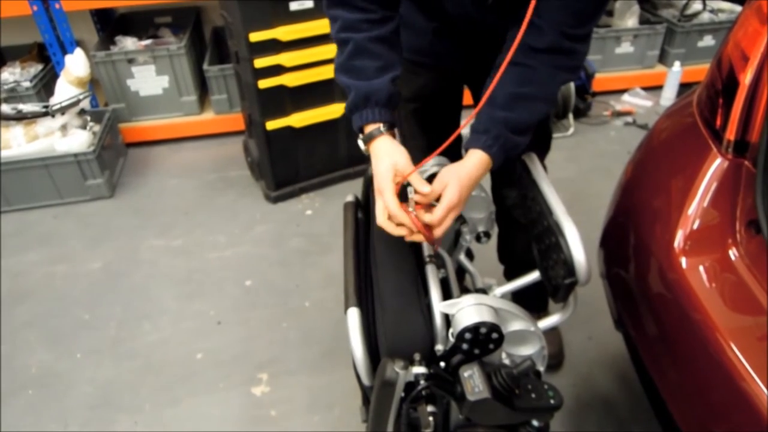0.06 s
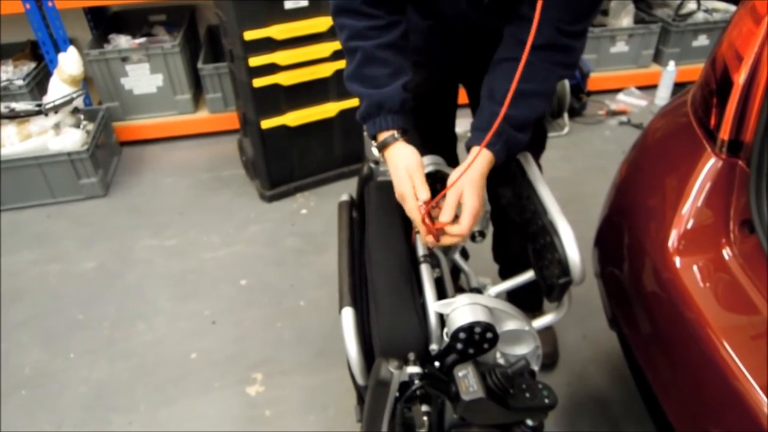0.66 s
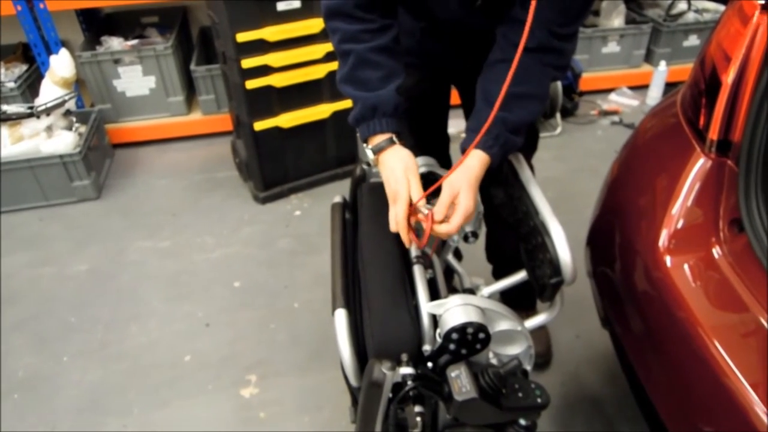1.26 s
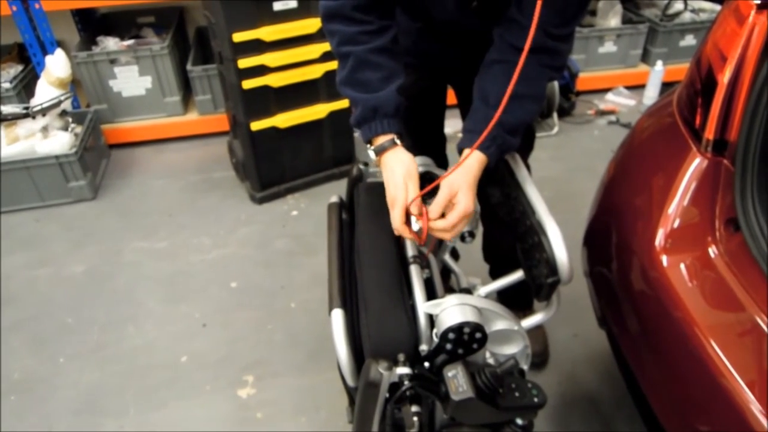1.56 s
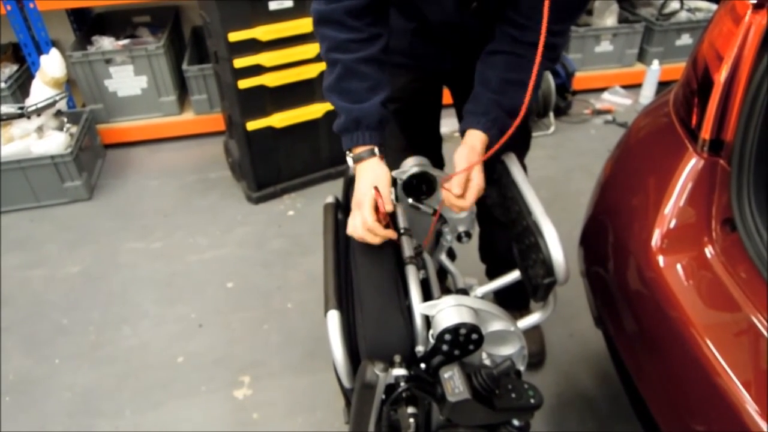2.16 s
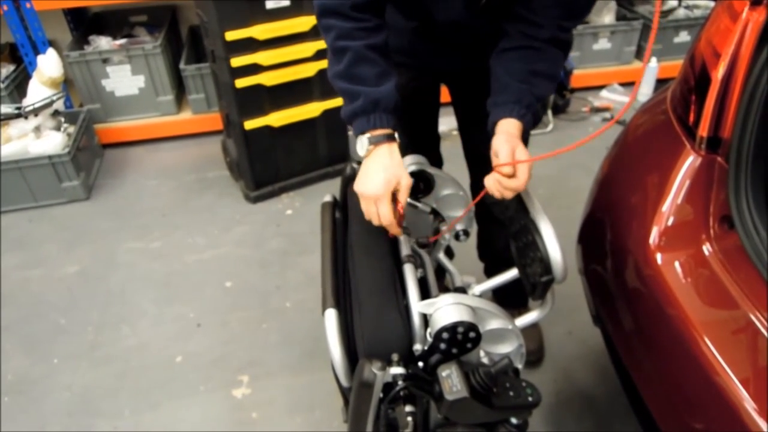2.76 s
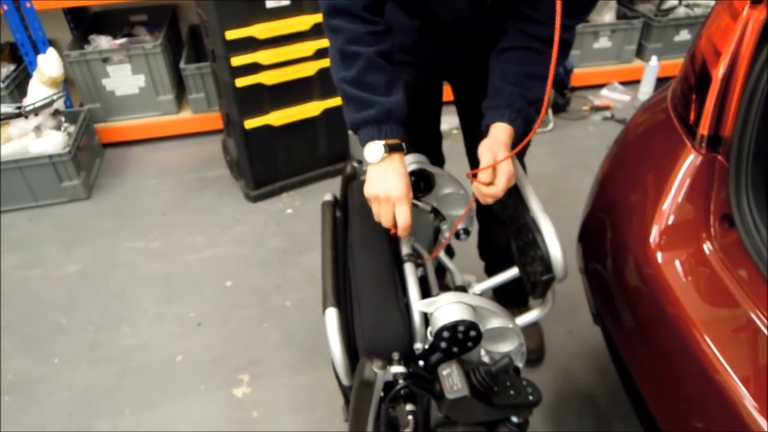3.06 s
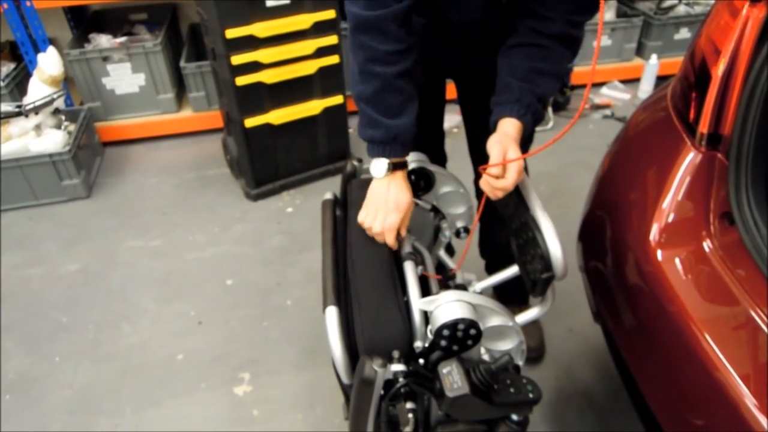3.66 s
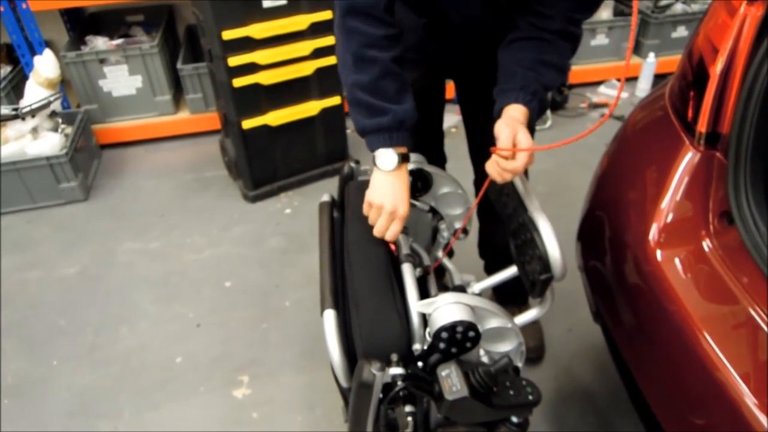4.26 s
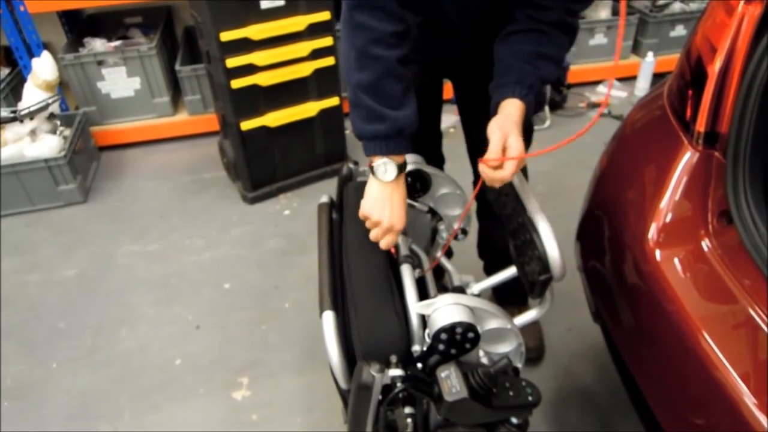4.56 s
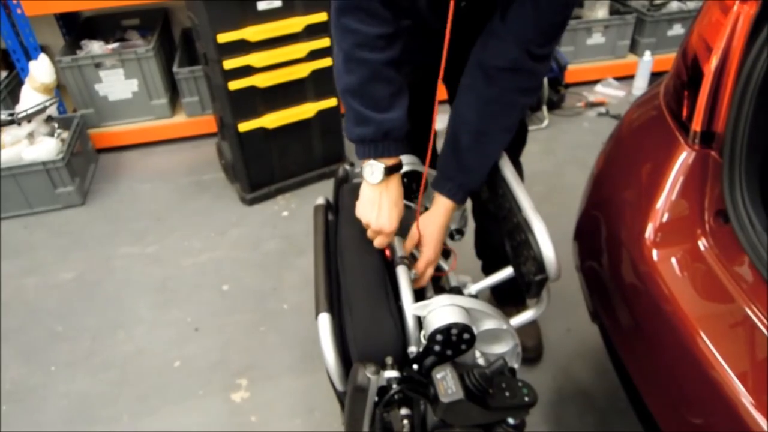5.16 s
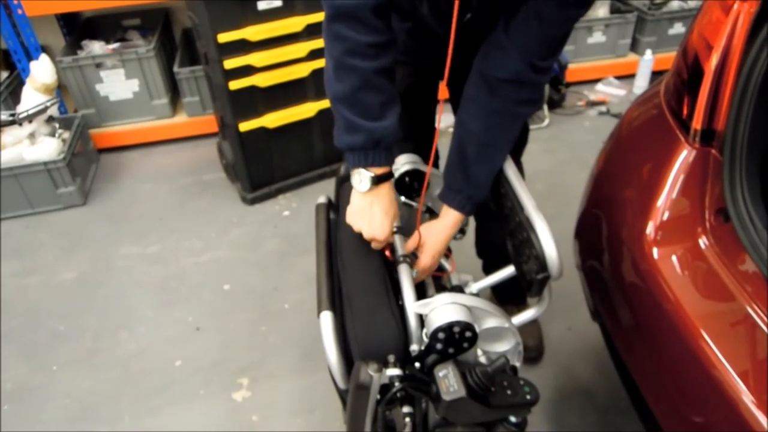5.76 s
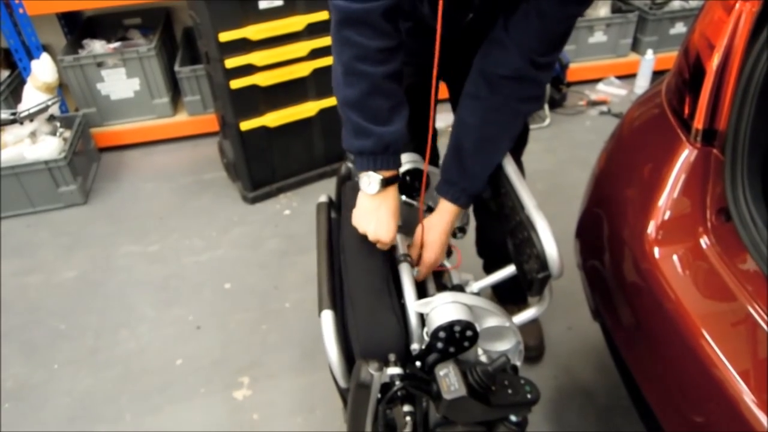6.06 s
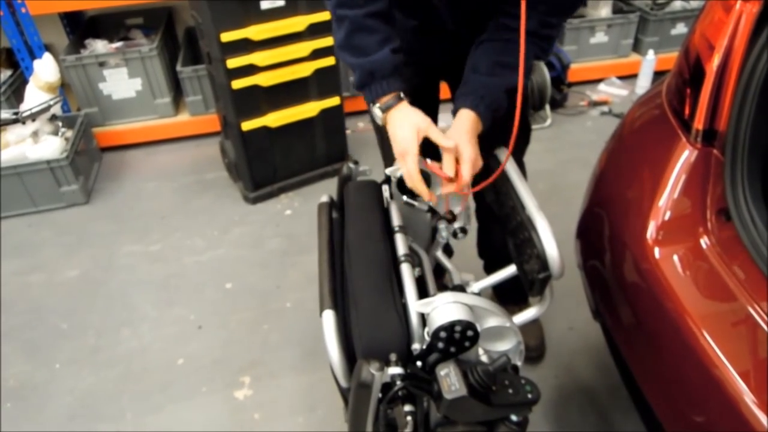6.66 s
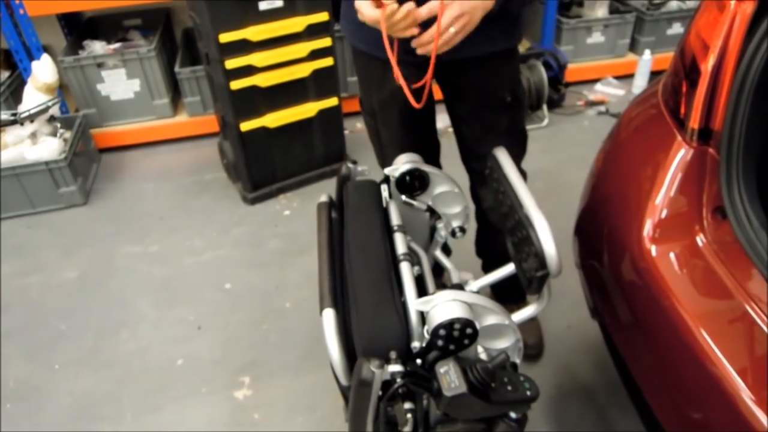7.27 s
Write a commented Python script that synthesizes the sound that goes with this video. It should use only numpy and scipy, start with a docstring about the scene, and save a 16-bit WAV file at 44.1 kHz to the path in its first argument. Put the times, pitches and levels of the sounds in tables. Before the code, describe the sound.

Close to the microphone, hands fasten a strap to a metal wheelchair frame. Clinks and two sharp snaps of a spring clip come first, followed by a few light knocks on tubing. The strap slides in short, soft hisses with tiny clicks, and one loud metallic clack ends the handling. The workshop adds a short echo and a low, steady murmur of ventilation.

```python
"""Spring clips snap shut and knock on the metal tubes of a folded wheelchair as hands fasten a strap.
Each impact excites the damped modes of gate, hook or frame; the nearest snaps overload the microphone.
Strap and sleeves slide with a friction hiss, and the chair rocks once on its tyres with a soft thud.
Ventilation murmurs behind them, and the hard walls of the workshop reverberate."""
import sys
import numpy as np
from scipy import signal
from scipy.fft import rfft, irfft, next_fast_len
from scipy.io import wavfile
from scipy.ndimage import uniform_filter1d

SR = 44100
rng = np.random.default_rng(int(sys.argv[2]) if len(sys.argv) > 2 else 0)


def dump_mix(stems):
    """Bounce the given channels to the path in sys.argv[1] as a 16-bit WAV at rate SR."""
    frames = np.atleast_2d(stems).T  # one column per channel
    limited = np.clip(frames, -1, 1)  # hard clip at full scale
    pcm = np.round(limited * 32767).astype(np.int16)
    wavfile.write(sys.argv[1], SR, pcm)


N = 331177
TIME = np.arange(N) / SR
RING_TIME = TIME[:SR]   # one second

# spectrum of the ventilation air: (frequency [Hz], gain [dB])
AIR_SPECTRUM = [(12, -42), (20, 1.5), (60, 0), (85, -5), (125, -5), (170, -7), (206, -2.5), (263, -10),
                (302, -6.5), (337, -11), (980, -13.5), (1090, -14.5), (1190, -16), (2000, -19),
                (14000, -28)]
# fan tones: (frequency [Hz], level [dB])
FAN_TONES = [(209.9, -63.5), (301.5, -74.5), (635.2, -76), (1163, -72.5)]
# stereo width of the air and of scattered sound: (frequency [Hz], side over mid [dB])
AIR_SIDE = [(60, -10), (180, -8.5), (540, -5), (1640, -3.5), (4950, -1), (14900, 1.5)]
SCATTER_SIDE = [(200, -20), (1300, -22), (2400, -18.5), (4400, -8), (8000, -6), (14000, 1.5)]
# decay of the room and of the frame's dense modes: (frequency [Hz], t60 [s])
ROOM_DECAY = [(200, .6), (1500, 1), (4000, 0.77), (8000, 0.57), (14000, 0.37)]
FRAME_DECAY = [(250, 0.14), (1500, 0.18), (4000, 0.092), (8000, 0.08), (14000, 0.11)]
# pulls of the strap through the hand: (peak time [s], half-width [s], level [dB])
STRAP_STROKES = [(3.356, 0.041, -44.5), (3.597, 0.06, -40.5), (4.082, 0.028, -47.5), (4.368, 0.099, -48),
                 (4.55, 0.024, -50.5), (5.518, 0.051, -40), (5.9, 0.065, -53.5)]
# spectra of cloth friction, metal contact, a whole knock and a snap: (frequency [Hz], gain [dB])
FRICTION_SPECTRUM = [(150, -22), (400, 0.5), (800, 0.5), (1500, -3), (3500, 0), (6000, -3.5), (9000, -1),
                     (14000, -6.5)]
CONTACT_SPECTRUM = [(300, -24), (1500, -2.5), (3500, 1.5), (9000, 2)]
KNOCK_SPECTRUM = [(60, -49), (170, -11.5), (270, -6), (550, -4), (900, -4.5), (1700, -2), (3000, 0.5),
                  (5200, -2.5), (6800, -3.5), (8200, -3), (10500, -13.5), (14000, -11.5)]
SNAP_SPECTRUM = [(100, -34), (1300, -34.5), (2400, -12), (3700, -13.5), (5000, -9), (6300, -6.5),
                 (7700, -7.5), (8900, 1.5), (9900, -4.5), (10700, -7), (14000, -13.5)]
# modes of the frame tubes, the steel hook and its gate: (frequency [Hz], relative level [dB], t60 [s])
TUBE_RESONANCES = [(272.2, -27, 0.39), (321, -24, 0.088), (436, -25.5, 0.41), (660, -34.5, 0.19),
                   (1161, -32, 0.36), (1351, -24.5, 0.068), (1438, -17, 0.08), (1560, -30.5, 0.18),
                   (1700, -16, 0.15), (1810, -17.5, 0.15), (1937, -19.5, 0.18), (2420, -27, 0.18),
                   (2830, -23, 0.17), (3430, -22, 0.081), (3570, -26, 0.073), (4296, -26.5, 0.1),
                   (4690, -26.5, 0.16)]
HOOK_RESONANCES = [(5960, -20.5, 0.13), (6000, -27.5, 0.72), (6060, -18.5, 0.088), (6230, -19, 0.095)]
GATE_RESONANCES = [(2940, -13, .2), (6158, -21, .35), (8820, -7.5, 0.027), (9180, -8.5, .14),
                   (9420, -11, 0.24), (9870, -12, .05)]
# knocks of a clip on the frame: (time [s], strength [dB], bass [dB], low mids [dB],
# hardness as treble tilt [dB/octave], favoured frequency [Hz], its boost [dB], hook ring [dB])
CLIP_KNOCKS = [(0.1013, 18, -4.5, 0.5, -5, 1090, 6.5, -8), (0.104, 14.5, 1.5, -2, -4, 1143, 14.5, -11),
               (0.257, 3.5, -3, 2, -16, 1160, 4.5, -20), (0.6712, 1.5, -0.5, 3.5, -8.5, 3080, 5, -22),
               (2.266, -7.5, 14.5, 8, -3, 1380, 18, -17), (2.7353, 13.5, 14, -3.5, 2.7, 1640, 6.5, -24),
               (2.771, -0.5, 20.5, -4, 0.5, 4500, 7, -22), (2.890, -4.5, 13, -7, -7, 2100, 11, -20),
               (3.680, 2.5, 7, 3, 2.5, 3840, 7, -25), (3.6945, 6.5, -11, -4, 2.5, 3860, 10.5, -17),
               (3.702, 6.5, 6.5, 3, 4, 1600, 9, -10), (6.1269, 8.5, 0, 1, 4.5, 1600, 8, -11),
               (6.1551, 26, -1, 5, -2.3, 4400, 6, 7), (6.160, 18.5, -8.5, 4, -4, 2550, 11, 12)]
# snaps of a gate: (time [s], strength [dB], body [dB], mids [dB], catch clack [dB], crack t60 [s])
GATE_SNAPS = [(1.5769, 21, -11, -10.5, 17.5, 0.0051), (1.9282, 31, 8, -7, 0, 0.0096),
              (1.9313, 24.5, -1, -4.5, -1.5, 0.013), (4.380, -10, 0, 5, 2, .02),
              (4.627, -9.5, 10, 11, 1, 0.036), (5.354, -11.5, 4, 5.5, 15.5, 0.023)]


def from_db(db):
    """Amplitude ratio of a level in decibels."""
    return 10 ** (np.asarray(db) / 20)


def unit_energy(x):
    """Normalisation of each channel to an energy of one."""
    return x / np.sqrt(np.sum(x ** 2, axis=-1, keepdims=True) + 1e-20)


def at_hz(points, hz):
    """Interpolation of a table on a log-frequency axis."""
    knots, values = np.transpose(points)
    return np.interp(np.log(np.maximum(hz, 1)), np.log(knots), values)


def bins(size):
    """Frequencies of a real Fourier transform."""
    return np.fft.rfftfreq(size, 1 / SR)


def coloured(x, *curves):
    """Minimum-phase (causal) filtering by the sum of the dB curves."""
    size = 2 * next_fast_len(x.shape[-1] // 2 + 1)
    gain = from_db(sum(at_hz(curve, bins(size)) for curve in curves))
    cepstrum = irfft(np.log(gain))
    cepstrum[1:size // 2] *= 2
    cepstrum[size // 2 + 1:] = 0
    return irfft(rfft(x, size) * np.exp(rfft(cepstrum)))[..., :x.shape[-1]]


def resonance(hz, db):
    """Selective excitation: the gain curve of a band favoured by the point of contact."""
    return [(hz / 1.25, 0), (hz, db), (hz * 1.25, 0)]


def fade(t60):
    """Exponential damping by 60 dB in t60 seconds."""
    return np.exp(-np.log(1000) * RING_TIME / max(t60, 1e-4))


def drift(rate_hz):
    """Random fluctuation: straight lines between Gaussian values of unit spread."""
    knots = rng.standard_normal(N)
    return np.interp(TIME * rate_hz, np.arange(N), knots)


def noise_burst(t60):
    """Damped white noise, the model for metal chatter and for scattering."""
    return unit_energy(rng.standard_normal(SR) * fade(t60))


def dense_ring(decays):
    """Modal overlap: countless close modes merge into noise, each band dying at its own rate."""
    spectrum = rfft(rng.standard_normal(SR))
    centres = np.geomspace(200, 14000, num=8)
    shares = [at_hz(np.c_[centres, one], bins(SR)) for one in np.eye(len(centres))]
    bands = [irfft(spectrum * share, SR) for share in shares]
    return unit_energy(sum(band * fade(at_hz(decays, hz)) for band, hz in zip(bands, centres)))


def modal_ring(modes, split=.008, partials=8):
    """Mode splitting: joined parts turn each mode into close partials of random strength that beat."""
    ring = 0
    for hz, db, t60 in modes:
        cluster = np.zeros(SR // 2 + 1, complex)   # one bin per hertz
        detune, strength = rng.standard_normal((2, partials))
        partial_hz = np.clip(hz * (1 + split * detune), 1, SR // 2).astype(int)
        cluster[partial_hz] = 1j * strength
        ring = ring + from_db(db) * unit_energy(irfft(cluster, SR) * fade(t60))
    return ring


def add(track, start_s, sound):
    """Superposition of a sound on a track at a given time."""
    start = round(start_s * SR)
    track[..., start:start + sound.shape[-1]] += sound[..., :N - start]


def widen(mid, side, width):
    """Diffuse-field coherence: two close microphone ports agree in the bass and differ in the treble."""
    side = coloured(side, width)
    return np.array([mid + side, mid - side])


def ventilation(air_db=-50.5, waver_rad=0.7, waver_hz=7):
    """Broadband air noise lies under fan tones that waver by random phase modulation."""
    mid, side = unit_energy(coloured(rng.standard_normal((2, N)), AIR_SPECTRUM)) * np.sqrt(N)
    hum = sum(from_db(db) * np.sqrt(2) * np.sin(2 * np.pi * hz * TIME + waver_rad * drift(waver_hz))
              for hz, db in FAN_TONES)
    return from_db(air_db) * widen(mid, side, AIR_SIDE) + hum


def workshop(x, build_s=0.0031):
    """Reverberation: wall reflections build into a diffuse field that decays exponentially."""
    build = 1 - np.exp(-RING_TIME / build_s)
    mid, side = (unit_energy(build * dense_ring(ROOM_DECAY)) for _ in range(2))
    return signal.fftconvolve(x[None], widen(mid, side, SCATTER_SIDE), axes=-1)[:, :N]


def microphone_ports(x, lag_s=15e-6, scatter_db=-8, scatter_t60=.004):
    """Path difference delays the left port; the housing scatters treble differently to each side."""
    size = next_fast_len(N)
    delay = np.exp(-2j * np.pi * bins(size) * lag_s)
    left = irfft(rfft(x, size) * delay, size)[:N]
    scattered = from_db(scatter_db) * signal.fftconvolve(x, noise_burst(scatter_t60))[:N]
    return np.array([left, x]) + widen(0, scattered, SCATTER_SIDE)


def chair_thud(peak_s=1.452, hz=65, peak_db=-36.5, attack_s=.08, release_s=0.024, ring_db=-7.5, t60=1.8):
    """Forced, then free vibration: the chair's lowest mode swells under a push and rings on its tyres."""
    age = TIME - peak_s
    push = np.exp(-(age / np.where(age < 0, attack_s, release_s)) ** 2)
    ring = (age > 0) * from_db(ring_db) * np.exp(-np.log(1000) * np.abs(age) / t60)
    phase = 2 * np.pi * hz * age + .4 * drift(rate_hz=25)
    return from_db(peak_db) * np.maximum(push, ring) * np.sin(phase)


def cloth_friction(grain_db=2.5, sleeves_s=(3.6, 6.15), sleeves_db=-58, swing_db=4):
    """Stick-slip friction: woven fibres catch under each strap stroke, and sleeves brush at random."""
    strokes = sum(from_db(db) * np.exp(-((TIME - peak_s) / half_s) ** 2)
                  for peak_s, half_s, db in STRAP_STROKES)
    working = uniform_filter1d(1.0 * ((TIME > sleeves_s[0]) & (TIME < sleeves_s[1])), SR // 10)
    sleeves = working * from_db(sleeves_db - swing_db * drift(rate_hz=11))
    grains = rng.standard_normal(N) * from_db(grain_db * drift(rate_hz=260))
    friction = unit_energy(coloured(grains, FRICTION_SPECTRUM)) * np.sqrt(N)
    return np.hypot(strokes, sleeves) * friction


def clip_knocks(spread_s=0.0027, knee_hz=1850, tilt_octaves=2.37, room_db=-12.5):
    """Impact excitation: hook cracks on tube, then both ring in their modes. Rows: direct, room feed."""
    out = np.zeros((2, N))
    spreading = 1 - np.exp(-RING_TIME / spread_s)   # the blow takes a moment to travel through the tubes
    for start_s, db, bass_db, low_mid_db, hardness, favoured_hz, favoured_db, hook_db in CLIP_KNOCKS:
        crack_gain = from_db(-7.5 + 0.58 * db)   # stronger blows crack more
        crack = crack_gain * coloured(noise_burst(t60=.017), CONTACT_SPECTRUM)
        blow = unit_energy(crack + unit_energy(spreading * dense_ring(FRAME_DECAY)))
        tubes = spreading * modal_ring(TUBE_RESONANCES)
        hook = from_db(hook_db) * modal_ring(HOOK_RESONANCES)
        body = [(305, bass_db), (700, low_mid_db), (knee_hz, 0)]
        tilt = [(knee_hz, 0), (knee_hz * 2 ** tilt_octaves, hardness * tilt_octaves)]   # hard is bright
        favoured = resonance(favoured_hz, favoured_db)
        knock = coloured(blow + tubes + hook, KNOCK_SPECTRUM, body, tilt, favoured)
        add(out, start_s, knock * from_db([[db], [db + room_db]]))
    return out


def gate_snaps(full_snap_db=30.5, ping_db=-10.5, scatter_db=-15, catch_hz=3890, room_db=-13.5):
    """Release of spring energy: a clip's gate strikes its catch and pings. Rows: direct, room feed."""
    out = np.zeros((2, N))
    for start_s, db, body_db, mids_db, catch_db, crack_t60 in GATE_SNAPS:
        ping = from_db(ping_db + db - full_snap_db) * modal_ring(GATE_RESONANCES)   # light snaps only tick
        crack = noise_burst(crack_t60)
        scattered = from_db(scatter_db) * noise_burst(t60=.11)   # from nearby parts
        grip = [(900, body_db), (2000, mids_db), (4000, mids_db), (8500, 0.0077)]
        snap = coloured(crack + ping + scattered, SNAP_SPECTRUM, grip, resonance(catch_hz, catch_db))
        add(out, start_s, snap * from_db([[db], [db + room_db]]))
    return out


def scene(cloth_room_db=-9):
    """Superposition of the ventilation, the reverberant field and the direct handling sounds."""
    clips, room_feed = clip_knocks() + gate_snaps()
    cloth = cloth_friction()
    direct = microphone_ports(clips + cloth + chair_thud())
    reverberation = workshop(room_feed + from_db(cloth_room_db) * cloth)
    return ventilation() + reverberation + direct


def record(dry, threshold_db=-14, squeeze=0.26, release_db_per_s=8.0, attack_s=0.021, ceiling=0.78):
    """Compression and saturation: loud hits lower the gain briefly, peaks round off, the top is cut."""
    level_db = 20 * np.log10(np.abs(dry).max(axis=0) + 1e-9)
    wanted_cut_db = squeeze * np.maximum(level_db - threshold_db, 0)
    recovery_db = release_db_per_s * TIME
    held_cut_db = np.maximum.accumulate(wanted_cut_db + recovery_db) - recovery_db
    pole = np.exp(-1 / (attack_s * SR))
    cut_db = signal.lfilter([1 - pole], [1, -pole], held_cut_db)
    rounded = ceiling * np.tanh(dry * from_db(-cut_db) / ceiling)
    low_pass = signal.ellip(10, .2, 70, 14250, fs=SR, output="sos")
    return signal.sosfilt(low_pass, rounded)


dry = scene()
out = record(dry)
dump_mix(out)
```